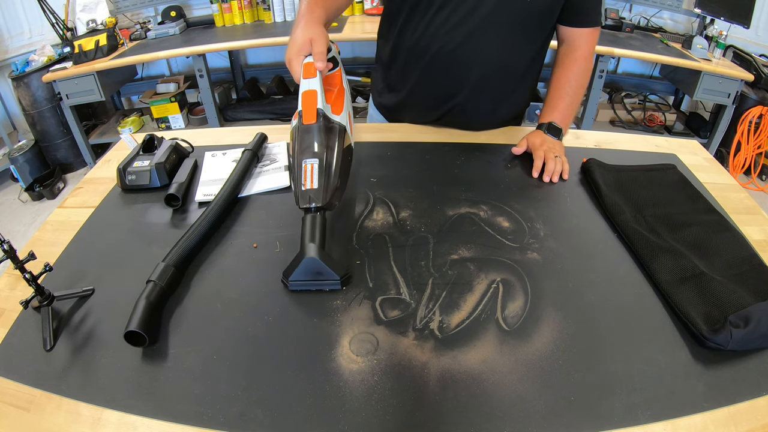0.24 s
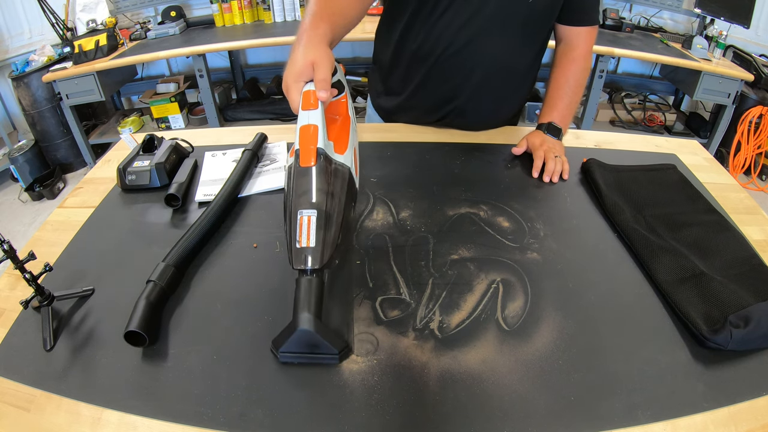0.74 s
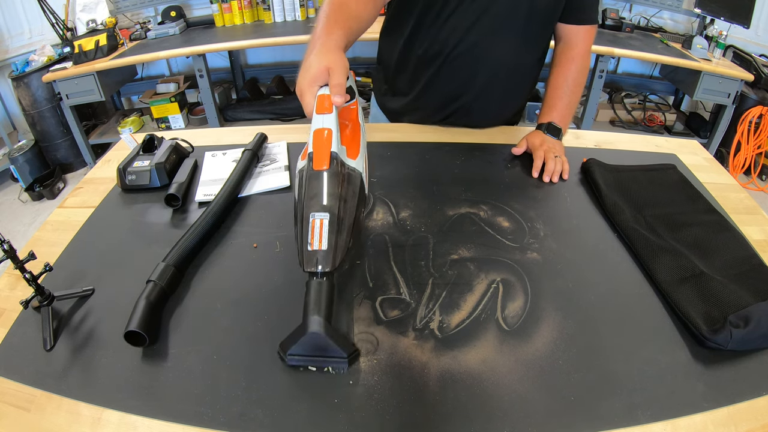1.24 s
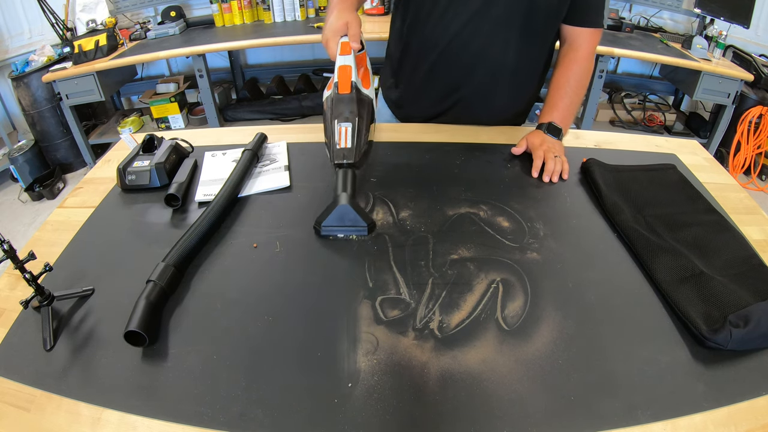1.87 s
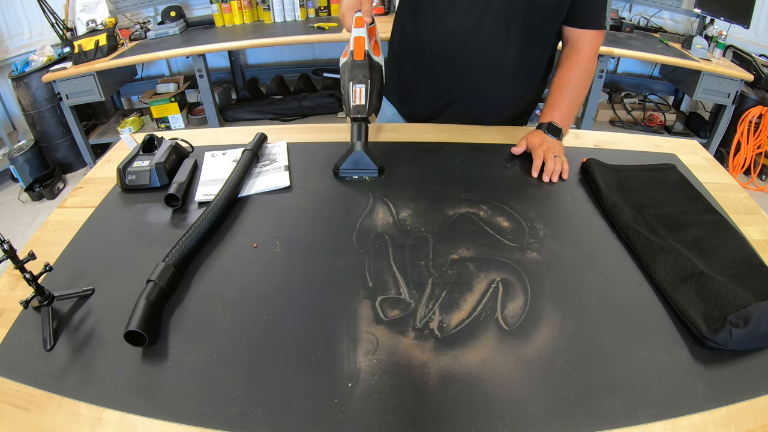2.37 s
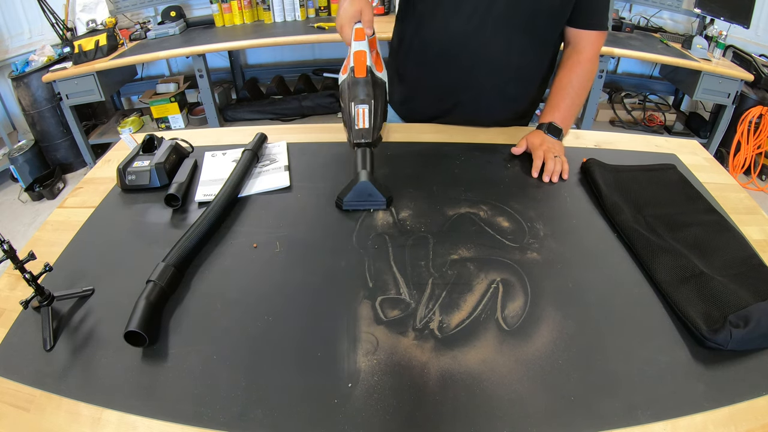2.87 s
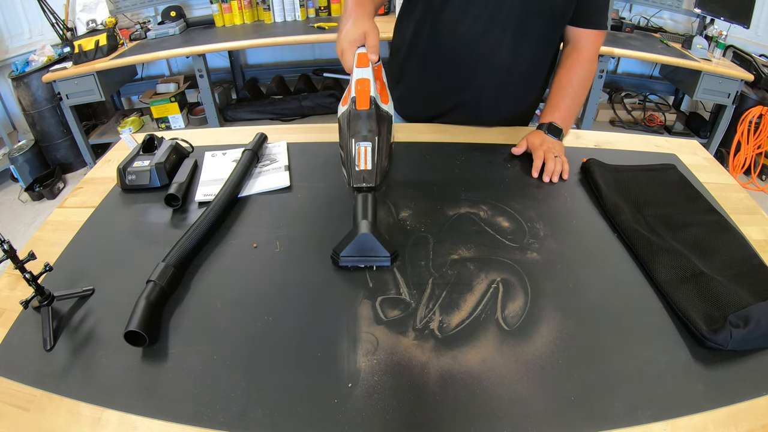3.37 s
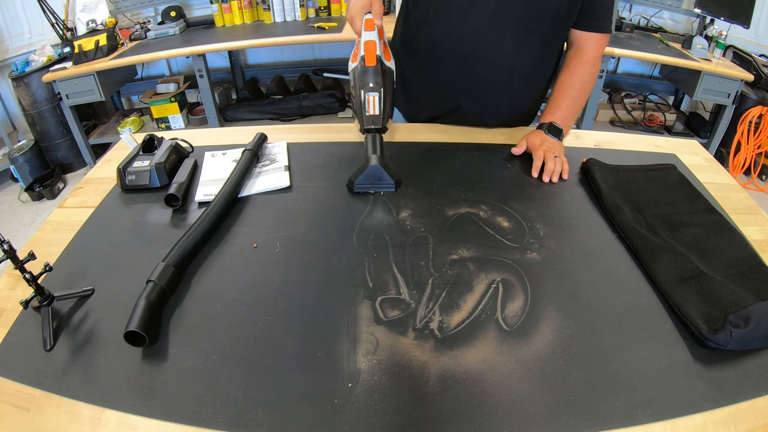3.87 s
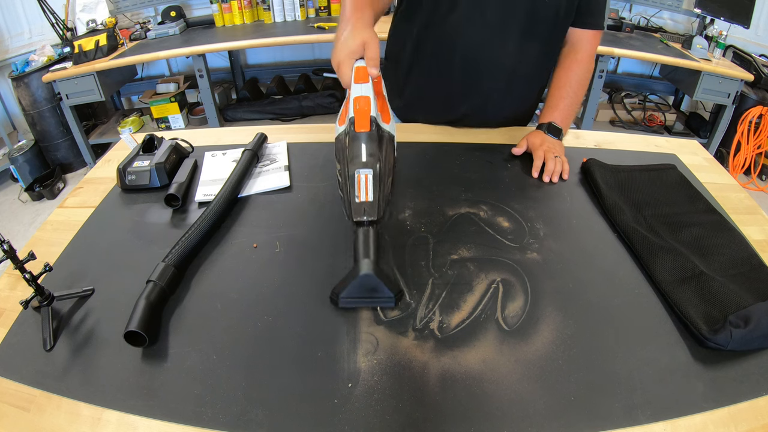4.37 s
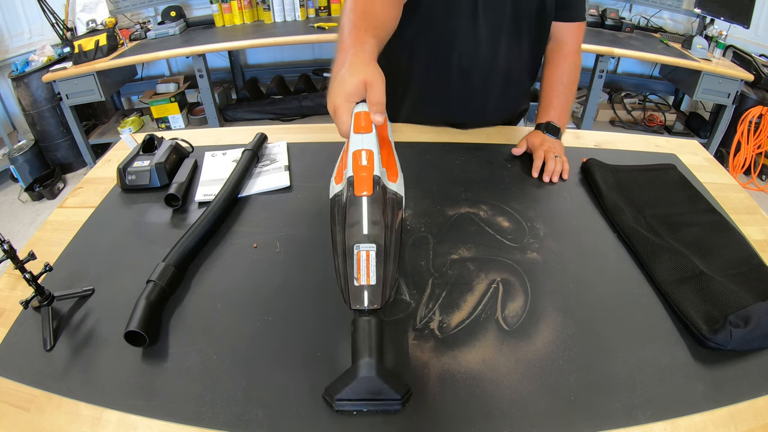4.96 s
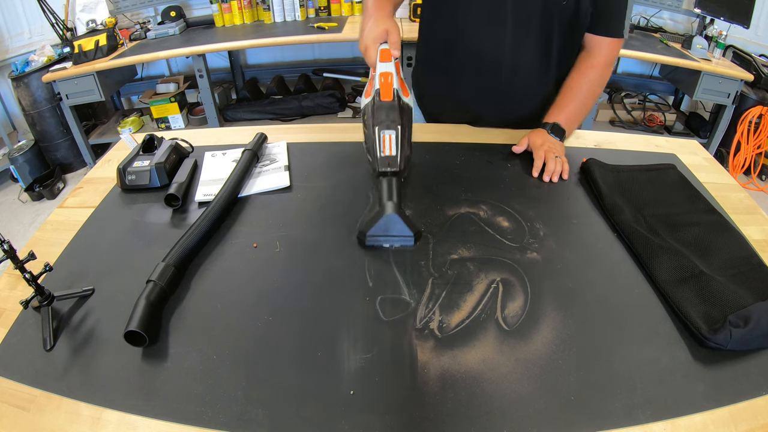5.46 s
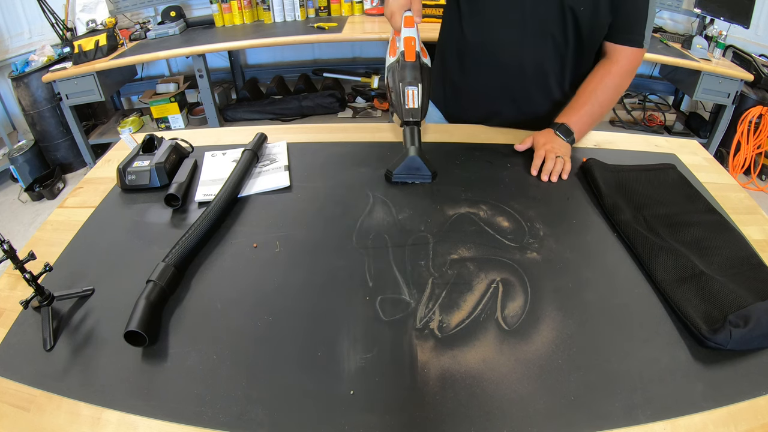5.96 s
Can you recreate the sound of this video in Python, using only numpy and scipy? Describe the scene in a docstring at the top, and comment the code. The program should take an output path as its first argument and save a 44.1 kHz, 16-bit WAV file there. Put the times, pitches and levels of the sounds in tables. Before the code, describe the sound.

A battery handheld vacuum whines steadily over rushing air, with bursts of hiss and brief whistles as it sucks sand off a table mat.

```python
"""A battery hand vacuum runs on a gritty table mat: its spinning fan hums and whines, air rushes
through it and sand ticks up the nozzle, whose lip whistles now and then. At 1 s it is pushed close
and the rush brightens. Drawn back, the nozzle seals on the mat at 2.5 s and sounds hollow.
A small push follows at 3.4 s, then a looser seal. Near 5 s the tool comes close once more
and is drawn away, while the low hum of the workshop, there all along, swells."""
import sys
import numpy as np
from scipy import signal
from scipy.fft import rfft, irfft, next_fast_len
from scipy.io import wavfile
from scipy.ndimage import uniform_filter1d, map_coordinates

SR = 44100
rng = np.random.default_rng(int(sys.argv[2]) if len(sys.argv) > 2 else 0)


def output_pcm(signal):
    """Save a mono or channel-first signal as 16-bit PCM at the path in sys.argv[1].

    Samples are clipped to [-1, 1] before scaling.
    """
    pcm = np.clip(np.atleast_2d(signal).T, -1, 1) * 32767
    wavfile.write(sys.argv[1], SR, np.round(pcm).astype(np.int16))


N = 273861
TIME = np.arange(N) / SR  # seconds

START_HZ, FULL_HZ, RUN_UP_S, CREEP_HZ_PER_S = 458.5, 468.6, .55, .3  # the shaft speeds up a little
HUM_FAR_DB, HUM_NEAR_DB = -25, -28.5
BLADES, WHINE_FAR_DB, WHINE_NEAR_DB = 12, -40, -56  # up close, the vents aim the whine past us
# The hum dips briefly. Each row: time in seconds, half length in seconds, change in dB.
HUM_DIPS = [(1.143, .03, -3), (1.308, 0.091, -3.5), (2.583, .03, -2.5), (4.947, 0.021, -3),
            (5.065, .05, -4), (5.22, 0.025, -3.5), (5.65, .1, -1.5)]
# The motor's higher tones. Each row: multiple of the shaft speed, level in dB when far, and when near.
MOTOR_OVERTONES = [(2, -59, -53), (3, -52.5, -49), (4, -58.5, -53.5), (6, -59.5, -55.5), (7, -59, -55.5),
                   (9, -56, -60), (11, -53, -56.5), (13, -59.5, -61), (14, -58, -65), (15, -62, -55),
                   (19, -63, -58), (20, -57, -58), (21, -60, -61), (22, -60, -55), (23, -62, -66),
                   (24, -61, -61), (26, -66, -66), (29, -66, -61), (30, -73, -64), (31, -68, -65)]

def motor(nearness, fade_db=4.0, fade_hz=1300, flutter_db=1.0):
    """Hum, blade whine and overtones follow the shaft; shifting echoes fade the overtones in and out."""
    run_up = (START_HZ - FULL_HZ) * np.exp(-TIME / RUN_UP_S)
    shaft_hz = FULL_HZ + run_up + CREEP_HZ_PER_S * TIME + .2514 * wobble(3)
    shaft_angle = turning(shaft_hz) + .016 * wobble(25)
    dips_db = sum(db * bell(TIME, at, half) for at, half, db in HUM_DIPS)
    hum_db = HUM_FAR_DB + (HUM_NEAR_DB - HUM_FAR_DB) * nearness ** 2 + dips_db
    out = tone(shaft_angle, hum_db + .48 * wobble(12) + .45 * wobble(35))
    whine_db = WHINE_FAR_DB + (WHINE_NEAR_DB - WHINE_FAR_DB) * nearness + swell(BLADES)
    whine_db += 1.48 * (1 + nearness) * wobble(8) + flutter_db * wobble(40)
    out += tone(BLADES * shaft_angle, whine_db)
    for multiple, far_db, near_db in MOTOR_OVERTONES:
        hz = multiple * shaft_hz.mean()
        level_db = far_db + (near_db - far_db) * nearness + swell(multiple)
        level_db += fade_db * hz / (hz + fade_hz) * wobble(5.01)  # high tones fade deepest
        level_db += flutter_db * wobble(30)
        out += tone(multiple * shaft_angle + .49 * wobble(9), level_db)
    return out


# One motor tone stands out or sinks for a while.
# Each row: multiple of the shaft speed, time in seconds, half length in seconds, change in dB.
TONE_SWELLS = [(12, 0.33, 0.35, 6), (12, 0.98, 0.26, -6), (12, 1.88, .13, 5.5), (12, 2.8, 0.042, 4.5),
               (12, 3.16, 0.16, -6.5), (12, 3.95, 0.14, 1), (12, 4.25, 0.11, -8), (12, 5.13, 0.16, 9),
               (12, 5.58, .075, 10.5), (12, 5.95, .17, 2), (11, 1.65, 0.088, 9), (11, 5.9, .2, 6),
               (22, 4.42, .07, 7), (22, 5.18, 0.27, 7.5), (24, 0.41, .35, 8), (29, .45, .45, 7)]

def swell(multiple):
    """How many dB louder or softer one motor tone is at each moment."""
    return sum(db * bell(TIME, at, half) for which, at, half, db in TONE_SWELLS if which == multiple)


# The rush of air before the tubes shape it. Each row: pitch in Hz, level in dB when far, and when near.
AIR_RUSH = [(228, -78, -76.5), (468, -72, -65.5), (714, -82, -76), (1300.0, -84.5, -76), (2300, -83.5, -77),
            (3540, -75.5, -79), (5070, -82, -81), (6440, -81, -80.5), (7800, -86, -80.5), (11160, -85, -77),
            (12900, -90.5, -82), (15200, -96, -88)]
# Pitches at which the nozzle and housing ring.
# Each row: pitch in Hz, half width in Hz, boost in dB when far, and when near.
TUBE_RESONANCES = [(1020, 190, 7.5, 3), (1627, 170, 12, 8), (1972, 187, 5.5, 8), (2534, 200, 6.5, 5.5),
                   (3140, 270, 5.5, 4.5), (4200, 380, 3, 4), (5070, 250, 2.5, -2), (5720, 200, 5, 2.5),
                   (7580, 380, 2.5, 6), (9090, 380, 2.5, 9), (10900, 590, 1, 1)]
# The hollow sound of a fully sealed nozzle. Each row: pitch in Hz, half width in Hz, change in dB.
HOLLOW_TONE = [(845, 107, 3.5), (1160, 78, 3.5), (1850, 360, -2), (2400, 75, 7.5), (3220, 610, -6.5)]

def airflow(nearness, flow_db, grit_db=-10, patchy_db=1.86):
    """Swirling air and grit sound through the tubes, changing as the tool comes near or seals."""
    noise = white() + amp(grit_db) * filtered(grit(), lambda hz: hz / (hz + 2500))
    hz, times, spectrum = signal.stft(noise, SR, nperseg=1024)  # short slices, split by pitch
    frame = np.minimum((times * SR).astype(int), N - 1)
    far_db, near_db = along(AIR_RUSH, hz)
    for centre, width, far_boost, near_boost in TUBE_RESONANCES:
        far_db += far_boost * bell(hz, centre, width)
        near_db += near_boost * bell(hz, centre, width)
    level_db = np.outer(far_db, 1 - nearness[frame]) + np.outer(near_db, nearness[frame])
    hollow_db = sum(db * bell(hz, centre, width) for centre, width, db in HOLLOW_TONE)
    level_db += flow_db[frame] + np.outer(hollow_db, seal()[frame])
    # Shifting echoes from table and body leave loud and soft patches in the rush.
    patches = uniform_filter1d(rng.standard_normal(spectrum.shape), size=5, axis=0)
    patches = uniform_filter1d(patches, size=24, axis=1)
    level_db += patchy_db * unit(patches)
    low_cut = hz ** 2 / (hz ** 2 + 110 ** 2)
    return signal.istft(spectrum * amp(level_db) * low_cut[:, None], SR)[1][:N]


# The nozzle seals on the mat. Each row: time in seconds, half length in seconds, added tightness.
NOZZLE_SEALS = [(2.526, 0.19, 1), (3.854, .11, 0.54)]

def seal(skimming=.1):
    """How tightly the nozzle sits on the mat, from 0 (open) to 1 (sealed)."""
    pressed = sum(tightness * bell(TIME, at, half) for at, half, tightness in NOZZLE_SEALS)
    return np.clip(skimming + pressed, 0, 1)


# The tool is pushed out and drawn back. Each row: time of the turn in seconds,
# half length of the push in seconds, the same for the pull, nearness at the turn.
HAND_PUSHES = [(1.0, .63, 0.65, 0.92), (3.382, 0.11, 0.13, 0.43), (4.93, 0.33, 0.56, 0.92)]

def stroke(rest=.061):
    """How near the tool is, from 0 (far) to 1 (near): each push eases out from rest and back."""
    travel = sum((peak - rest) * bell(TIME, at, np.where(TIME < at, push, pull))
                 for at, push, pull, peak in HAND_PUSHES)
    return np.clip(rest + travel, 0, 1)


# Sand skittering up the tube. Each row: pitch in Hz, relative level in dB.
SAND_HISS = [(1500, -50), (4000, 1), (7000, -8), (9200, 9), (11000, 4.5), (13500, -3), (16000, -13)]
# The nozzle's throat roaring. Each row: pitch in Hz, relative level in dB.
THROAT_ROAR = [(600, -40), (1300, -15), (1700, 1.5), (2100, -4.5), (2500, -11), (3200, -2.5), (4000, -15),
               (7000, -35)]
# The nozzle gulps a patch of sand.
# Each row: time in seconds, half length in seconds, hiss level in dB, roar level in dB.
SAND_GULPS = [(.27, 0.13, -49, -46), (.78, 0.13, -54, -46.5), (1.23, 0.12, -43.5, -50),
              (1.536, 0.096, -42.5, -55), (1.78, 0.11, -54, -43), (2.115, 0.087, -45.5, -62),
              (3.41, 0.1, -49, -44.5), (3.67, .054, -44.5, -60), (4.462, .078, -45, -66),
              (4.724, .08, -52, -44.5), (5.08, 0.099, -43, -49), (5.39, 0.11, -47.5, -40.5)]

def gulps(grains_per_second=5000):
    """Each patch of sand hisses up the tube as a shower of grains and makes the throat roar."""
    hiss = unit(filtered(grit(grains_per_second), lambda hz: amp(along(SAND_HISS, hz)[0])))
    roar = unit(filtered(white(), lambda hz: amp(along(THROAT_ROAR, hz)[0])))
    return sum(bell(TIME, at, half) * (amp(hiss_db) * hiss + amp(roar_db) * roar)
               for at, half, hiss_db, roar_db in SAND_GULPS)


def grit(per_second=700, spread_db=2.0):
    """Sand grains click against the nozzle wall, many small and a few larger."""
    hits = rng.random(N) < per_second / SR
    size = amp(spread_db * np.minimum(rng.exponential(size=N), 3))
    sign = rng.choice([-1, 1], N)
    return unit(hits * size * sign) * np.sqrt(SR / 2)  # as strong as white()


# Whistles at the nozzle's lip.
# Each row: time in seconds, half length in seconds, pitch in Hz, half width in Hz, level in dB.
LIP_WHISTLES = [(.85, 0.15, 2400, 60, -50), (1.43, 0.078, 2440, 60, -48), (1.93, 0.15, 4200, 150.2, -43),
                (3.42, 0.031, 4620, 130, -42), (3.529, 0.083, 4230, 130, -41.5),
                (3.89, 0.1, 2430, 55, -48.5), (5.033, 0.04, 4480, 80, -51), (5.16, 0.14, 2510, 80, -45),
                (5.62, 0.11, 4150, 130, -44)]

def lip_whistles():
    """Air blows over the tilted lip as it skims the mat, making short, breathy notes."""
    out = np.zeros(N)
    for at, half, pitch, width, db in LIP_WHISTLES:
        breath = unit(filtered(white(), lambda hz: np.sqrt(bell(hz, pitch, width))))
        out += amp(db) * bell(TIME, at, half) * breath
    return out


# The room's rumble. Each row: pitch in Hz, level in dB per Hz.
ROOM_RUMBLE = [(10, -87), (25, -80), (38, -71), (55, -75.5), (75, -70), (120, -71.5), (180, -74.5),
               (250, -84.5), (400, -84), (800, -120)]
# The workshop's low hums.
# Each row: starting pitch in Hz, drift in Hz per second, level in dB before the swell, and after.
ROOM_HUMS = [(90.7, -.8, -66, -44.5), (105.2, .6, -45.5, -45.5), (147.1, -1.45, -55, -40)]

def workshop(swell_at_s=4.98, swell_s=.07, waver_db=1.0, sway_db=1.34):
    """Three low hums drift and throb against each other over the rumble; two swell together."""
    swollen = .5 + .5 * np.tanh((TIME - swell_at_s) / swell_s)
    out = filtered(white(), lambda hz: amp(along(ROOM_RUMBLE, hz)[0]))
    for hz, drift, before_db, after_db in ROOM_HUMS:
        level_db = before_db + (after_db - before_db) * swollen
        level_db += waver_db * wobble(9.1) + sway_db * wobble(1.53)
        out += tone(turning(hz + drift * TIME), level_db)
    return out


def amp(db):
    """Turn decibels into a number to multiply by."""
    return 10 ** (np.asarray(db) / 20)


def unit(x):
    """Scale x to an average strength (rms) of 1."""
    return x / np.sqrt(np.mean(x ** 2) + 1e-20)


def along(table, hz):
    """Read each level column of a table at any pitch, sliding between its rows."""
    pitches, *columns = np.transpose(table)
    return [np.interp(np.log(hz + 1), np.log(pitches), column) for column in columns]


def bell(x, centre, half_width):
    """A smooth bump: 1 at the centre, about 0.6 at half_width to either side."""
    return np.exp(-.5 * ((x - centre) / half_width) ** 2)


def wobble(rate):
    """A smooth curve through `rate` random values a second."""
    values = rng.standard_normal(int(N * rate / SR) + 4)
    grid = np.linspace(0, N, 4096)
    curve = map_coordinates(values, [grid * rate / SR], mode="mirror")
    return np.interp(np.arange(N), grid, curve)


def filtered(x, gain):
    """Turn each pitch in x up or down by gain(hz)."""
    size = next_fast_len(N + SR // 4)
    hz = np.fft.rfftfreq(size, 1 / SR)
    return irfft(rfft(x, size) * gain(hz), size)[..., :N]


def white():
    """An even hiss of 0 dB per Hz."""
    return rng.standard_normal(N) * np.sqrt(SR / 2)


def turning(hz):
    """The angle of something that turns hz times a second."""
    return 2 * np.pi * np.cumsum(hz) / SR


def tone(angle, db):
    """A pure tone at the given level, starting anywhere in its cycle."""
    return np.sqrt(2) * amp(db) * np.sin(angle + rng.uniform(0, 2 * np.pi))


def scene(near_flow_db=-1.5, flow_sway_db=-.34):
    """The tool is straight ahead, so left and right sound alike."""
    nearness = stroke()
    flow_db = near_flow_db * nearness + flow_sway_db * wobble(3.87)
    sound = motor(nearness) + airflow(nearness, flow_db) + gulps() + lip_whistles() + workshop()
    return np.array([sound, sound])


FAINT_HISS_DB, TOP_HZ = -109, 15850

def record(dry):
    """Add a very faint, even hiss, different in left and right, and cut everything above TOP_HZ."""
    hiss = amp(FAINT_HISS_DB) * np.array([white(), white()])
    return filtered(dry + hiss, lambda hz: hz < TOP_HZ)


dry = scene()
out = record(dry)
output_pcm(out)
```